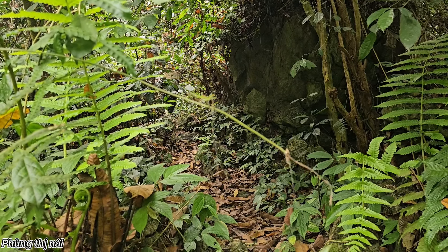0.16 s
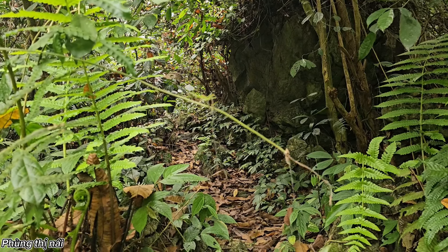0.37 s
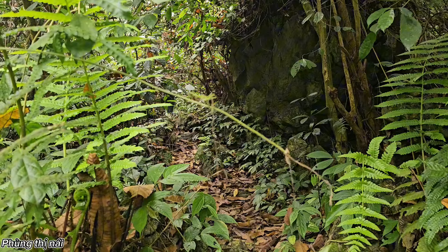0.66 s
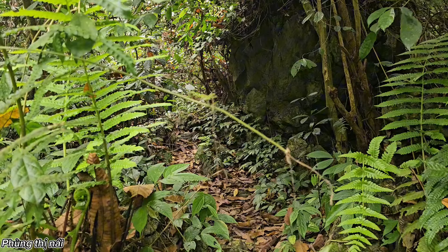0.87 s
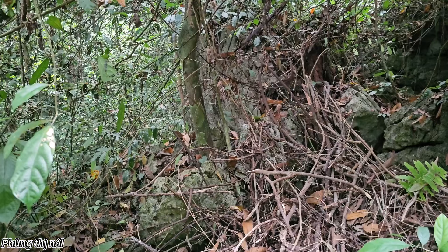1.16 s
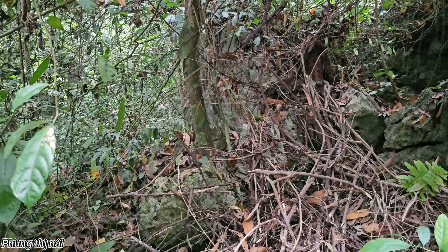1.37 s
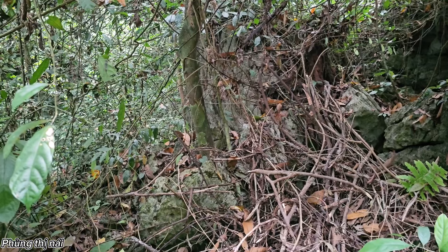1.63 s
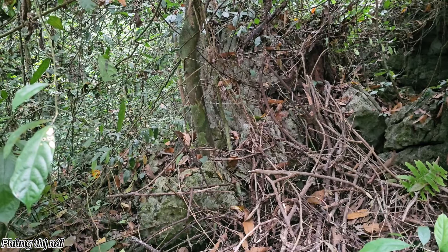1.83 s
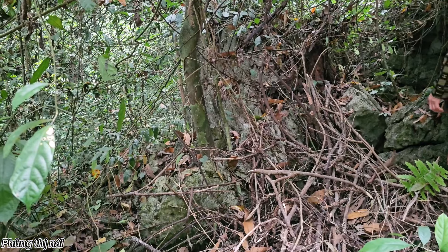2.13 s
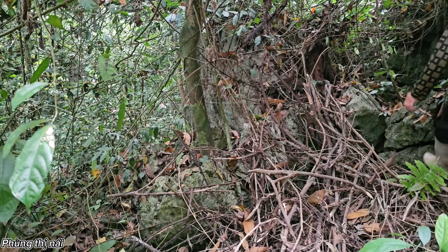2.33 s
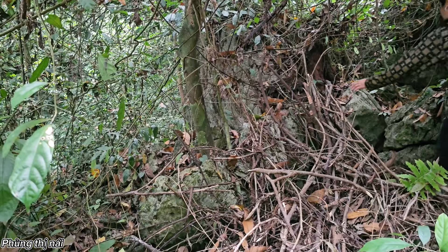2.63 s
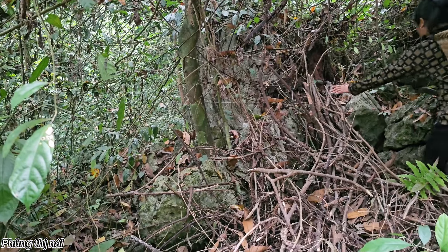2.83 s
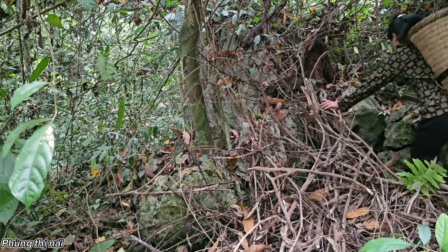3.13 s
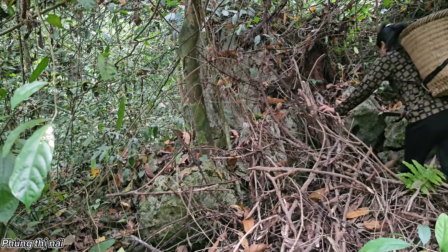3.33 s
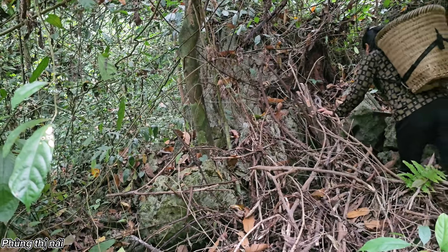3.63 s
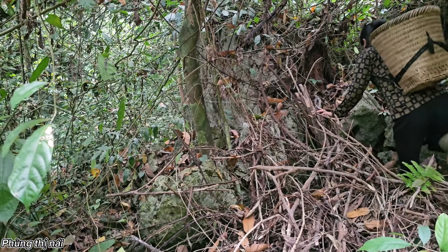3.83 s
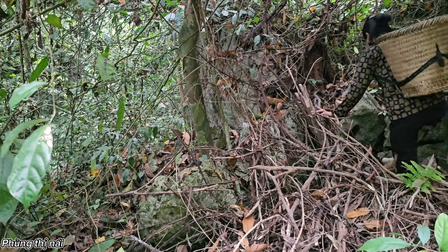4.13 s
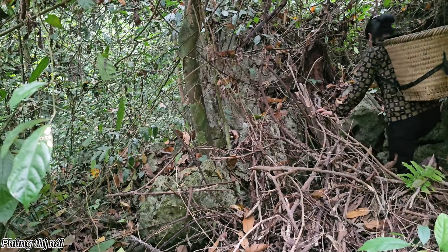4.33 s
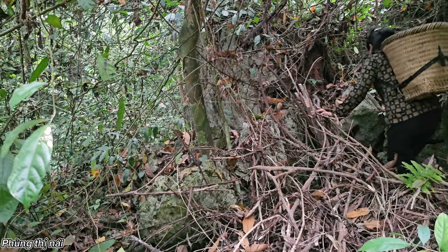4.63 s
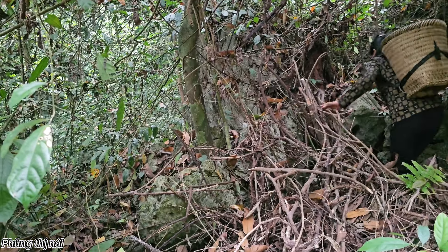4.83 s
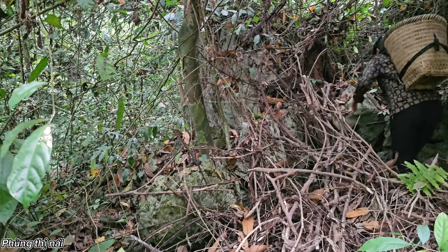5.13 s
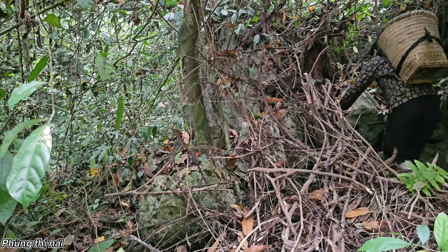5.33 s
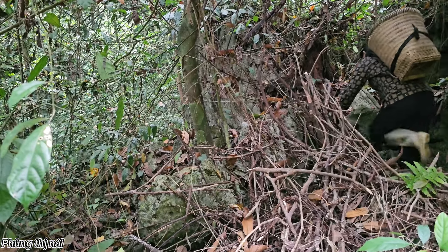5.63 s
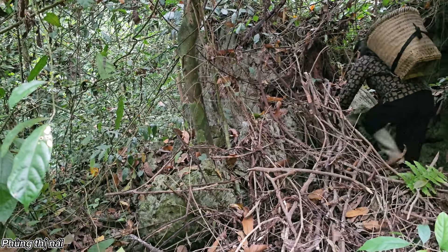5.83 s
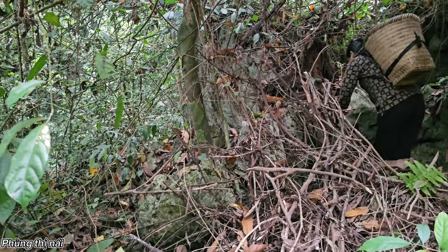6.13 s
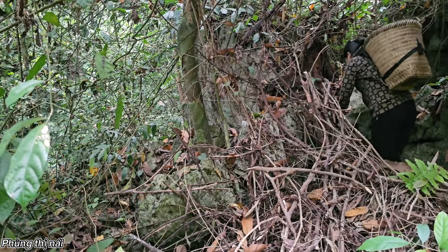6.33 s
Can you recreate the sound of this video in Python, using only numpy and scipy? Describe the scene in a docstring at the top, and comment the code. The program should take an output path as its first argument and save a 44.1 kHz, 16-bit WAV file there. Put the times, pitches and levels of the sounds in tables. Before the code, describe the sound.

Someone climbs past a heap of dead branches, rustling and snapping twigs; a bird whistles twice before a heavy hollow knock.

```python
"""Climbing past a heap of dead branches

A fluttering forest hiss with a faint far drone of narrow noise bands stops abruptly; a stiller spot follows.
A person climbs past the heap: sticks and soft ground ring as damped modes, leaves crackle as bursts of
fractures, thin twigs snap, and clothes brush the plants as swelling grains over softly stirred litter.
One thick branch gives a loud hollow knock, and a bird whistles twice in gliding, hoarse tones."""
import sys
import numpy as np
from scipy import signal
from scipy.fft import rfft, irfft, next_fast_len
from scipy.io import wavfile
from scipy.ndimage import uniform_filter1d, minimum_filter1d

SR = 44100
rng = np.random.default_rng(int(sys.argv[2]) if len(sys.argv) > 2 else 0)


def digitize_waveform(pressure):
    """Quantize a signal to 16-bit integers and store it at the path in sys.argv[1].

    Rows of a 2-D input are taken as channels; values are limited to [-1, 1].
    """
    field = np.atleast_2d(pressure).T
    bounded = np.clip(field, -1, 1)
    quanta = np.round(bounded * 32767).astype(np.int16)
    wavfile.write(sys.argv[1], SR, quanta)


N = 286341
TIME = np.arange(N) / SR

# soft ground under a foot: start_s, contact_s, pitch_hz, lower_mode_db, upper_mode_db
FOOTFALLS = [(1.021, 0.0021, 68.4, -31, -38.5), (3.18, 0.006, 85.4, -20, -25.5),
             (3.321, 0.0072, 94, -33.5, -34.5), (3.362, 0.038, 82.4, -50, -67),
             (5.366, .008, 85.7, -25.5, -9.5)]


def from_db(db):
    """Decibels to gain."""
    return 10 ** (np.asarray(db) / 20)


def rms_one(x):
    """Scale to unit rms."""
    return x / np.sqrt(np.mean(x ** 2) + 1e-20)


def in_time(rows):
    """Each column of a curve, joined by straight lines at every sample."""
    s, *columns = np.transpose(rows)
    return [np.interp(TIME, s, column) for column in columns]


def coloured(x, spectrum):
    """Give a steady signal a spectrum; rms 1."""
    hz, db = np.transpose(spectrum)
    size = next_fast_len(N)
    bins_hz = np.maximum(np.fft.rfftfreq(size, 1 / SR), 1)
    gain = from_db(np.interp(np.log(bins_hz), np.log(hz), db))
    return rms_one(irfft(rfft(x, size) * gain, size)[:N])


def drift(rate):
    """Random wander through `rate` new values a second, with a spread a little under 1."""
    return np.interp(TIME * rate, np.arange(N), rng.standard_normal(N))


def grains(per_s, spread_db):
    """Tiny fractures at random moments, of uneven size and either sign."""
    size_db = spread_db * np.minimum(rng.exponential(1, N), 3)
    sizes = from_db(size_db) * rng.choice([-1, 1], N)
    return sizes * (rng.random(N) < per_s / SR)


def burst(start, rise, hold, decay, steepness):
    """Samples and envelope of a push that swells, holds and dies; its square integrates to 1 over seconds."""
    span = slice(max(int((start - .06) * SR), 0), min(int((start + .2) * SR), N))
    t = TIME[span] - start
    swell = np.minimum(t, 0) / max(rise, 1e-4)
    fall = (np.maximum(t - hold, 0) / max(decay, 1e-4)) ** steepness
    shape = np.exp(swell - fall)
    return span, shape / np.sqrt(np.sum(shape ** 2) / SR)


def add_mode(out, start, contact, hz, db, ring_cycles, rough, swell_cycles):
    """A heavily damped mode, driven while the contact lasts and then left to die."""
    t = TIME[:min(SR // 5, N - int(start * SR))]
    swell = 1 - np.exp(-(t * hz / swell_cycles) ** 2)
    # the contact lets go gradually
    free_cycles = np.logaddexp(0, (t - .8 * contact) * hz * 3) / 3
    shape = swell * np.exp(-free_cycles / ring_cycles)
    # the pitch is pulled about, with a new random value every two cycles
    wobble = np.interp(t * hz / 2, np.arange(2000), rng.standard_normal(2000))
    wave = shape * np.sin(2 * np.pi * hz * np.cumsum(1 + rough * wobble) / SR)
    # the mode's energy is that of a signal at this rms level for the length of the contact
    out[int(start * SR):][:len(t)] += from_db(db) * wave * np.sqrt(contact * SR / np.sum(wave ** 2))


def background():
    """Still air as coloured noise, under a faint far hum that comes and goes with a wavering pitch."""
    # still air by the heap: frequency_hz, relative_level_db
    air = [(30, 11), (70, 1.5), (130, -9), (240, -2), (320, -12.5), (430, -5), (600, -17), (1000, -18),
           (1350, -12), (1900, -15), (4000, -20), (8000, -23), (16000, -17)]
    # hum: time_s, pitch_hz, relative_level_db
    hum_curve = [(1.95, 438.5, -95), (2.18, 458, -72), (2.35, 406, -78), (2.8, 437, -88.5),
                 (3.55, 430, -79.5), (4.0, 425, -96), (4.75, 428, -81.5), (5.1, 446, -78),
                 (5.6, 432, -87.5)]
    hz, db = in_time(hum_curve)
    level = from_db(db - 2.5 + 2 * drift(12))
    wavering_hz = hz * (1 + 0.011 * drift(18))
    hum = level * np.sin(2 * np.pi * np.cumsum(wavering_hz) / SR)
    return hum + from_db(-75) * coloured(rng.standard_normal(N), air)


def first_spot():
    """A fluttering forest hiss, and a far drone whose narrow bands each swell and wander."""
    # colour of the hiss: frequency_hz, relative_level_db
    hiss_colour = [(40, -7.5), (220, -6.5), (300, -10.5), (450, -1.5), (1050, -5.5), (1450, 1.5),
                   (1950, -9), (2700, 0.5), (3800, -5.5), (4500, 2), (5200, -13.5), (5850, -6), (6200, 0.5),
                   (8800, 1.5), (12000, -9), (16000, -10)]
    # level curves, trimmed below: time_s, hiss_db, drone_upper_bands_db
    hiss_levels = [(0.0, -55, -68), (0.044, -54.5, -68), (0.196, -60, -66), (0.23, -54, -57.5),
                   (0.574, -55.5, -58), (0.598, -57, -64), (0.81, -59.5, -58.5), (0.858, -60.5, -69),
                   (0.986, -56.5, -54.5), (1.06, -59, -66.5)]
    # bands of the drone: centre_hz, width_hz, relative_level_db
    drone_bands = [(405, 14, -2.5), (815, 30, 7), (1673, 31, 10.5), (2520, 25, 16.5), (2780, 28, -6),
                   (3270, 84, -23), (3390, 27, 9.5), (4520, 200, -21)]
    hiss_db, upper_db = in_time(hiss_levels)
    drone = np.zeros(N)
    for hz, width, db in drone_bands:
        r = np.exp(-np.pi * width / SR)
        # slowly changing noise spreads a tone into a narrow band
        spread = rms_one(signal.lfilter([1], [1, -r], rng.standard_normal((2, N))))
        phase = 2 * np.pi * np.cumsum(hz * (1 + .006 * drift(14))) / SR
        band = spread[0] * np.cos(phase) + spread[1] * np.sin(phase)
        swell_db = 3 * drift(50)
        level_db = upper_db - 16.0 if hz > 2000 else -71
        # for the same table level, a wider band carries more power
        drone += from_db(level_db + db + swell_db) * np.sqrt(width / 50) * band
    flutter_db = 1.6 * drift(70)
    hiss = from_db(hiss_db + 2.13 + flutter_db) * coloured(rng.standard_normal(N), hiss_colour)
    return hiss + drone


def bird():
    """Two thin, hoarse whistles, one falling and one rising; each swells as it glides, then fades on its last pitch."""
    # whistles: start_s, glide_s, first_pitch_hz, last_pitch_hz, relative_level_db, fade_s
    whistles = [(2.815, .15, 2606, 2139, -49, .015), (3.127, 0.067, 2690, 2884, -43, 0.043)]
    swell_over_glide_db = 16
    out = np.zeros(N)
    for s, glide, first_hz, last_hz, db, fade in whistles:
        progress = np.clip((TIME - s) / glide, 0, 1)
        hz = first_hz + (last_hz - first_hz) * progress
        release = np.exp(-np.clip((TIME - s - glide) / fade, 0, 20))
        flutter_db = 3.5 * drift(180)
        level_db = db - swell_over_glide_db * (1.5 - progress) + flutter_db
        level = (TIME > s) * release * from_db(level_db)
        quaver = 1 + .028 * drift(900)  # fast pitch jitter makes it hoarse
        out += level * np.sin(2 * np.pi * np.cumsum(hz * quaver) / SR)
    return out


def sweeps():
    """Levels in dB of brushing, sheen and litter: each stroke swells smoothly and lets go a little faster."""
    # clothes sweep past a plant: peak_s, swell_s, brushing_db, sheen_db, dragged_litter_db
    strokes = [(1.12, 0.1, -81, -74, -67), (2.2, 0.059, -76, -82, -72), (2.35, .11, -70.5, -88, -74.5),
               (2.66, 0.037, -91, -78, -67), (2.931, 0.21, -78, -85, -80.5), (3.36, .08, -68.5, -76, -66.5),
               (4.11, 0.094, -73.5, -73.5, -86), (4.32, 0.22, -76.5, -72.5, -82),
               (4.689, 0.067, -72, -66, -95.5), (4.9, .08, -80, -77.5, -88),
               (5.25, 0.13, -75.5, -75.5, -74), (5.428, 0.026, -81.5, -78, -72.5),
               (5.62, .12, -80, -80, -73.5), (5.92, 0.12, -76.5, -73, -94),
               (6.209, 0.067, -78.5, -73.5, -70.5), (6.47, 0.072, -86, -77.5, -72.5)]
    rest_db = [[-89.5], [-92], [-84]]  # brushing, sheen and litter between strokes
    release_share = 0.72  # release as a share of the swell
    power = from_db(rest_db) ** 2 * np.ones(N)
    for s, swell, *layer_db in strokes:
        width = np.where(TIME < s, swell, swell * release_share)
        hump = np.exp(-np.minimum(((TIME - s) / width) ** 2, 20))
        power += from_db(layer_db)[:, None] ** 2 * hump
    return 10 * np.log10(power)


def litter(dragged_db):
    """The litter is dragged along by each stroke, and gives and settles under each footfall."""
    # softly stirred litter: frequency_hz, relative_level_db
    litter_colour = [(30, 4.5), (220, -5), (550, -2.5), (800, -6), (1400, -7), (2000, -14), (4000, -14),
                     (12000, -32.5)]
    settle_db, settle_follows = -51, 0.291  # level under a 0 dB footfall; share of the footfall's dB followed
    press_s, settle_s = .02, 0.04
    level = from_db(dragged_db)
    for s, _, _, lower_db, _ in FOOTFALLS:
        give = np.exp(np.minimum((TIME - s) / press_s, (s - TIME) / settle_s))
        level += from_db(settle_db + settle_follows * lower_db) * give
    flutter = from_db(2.5 * drift(45))
    return level * flutter * coloured(rng.standard_normal(N), litter_colour)


def brushing():
    """Cloth slides over foliage, catching with tiny ticks, while the litter stirs softly."""
    # clothes brushing the plants: frequency_hz, relative_level_db
    brush_colour = [(800, -18), (1400, -9.5), (2000, -11), (3400, -6), (4550, 6.5), (5600, -6.5),
                    (7000, -2.5), (8000, 4.5), (9500, -10), (13000, -10.5), (16000, -17)]
    # bright sheen of sliding cloth: frequency_hz, relative_level_db
    sheen_colour = [(5000, -37.5), (7000, -6.5), (8600, 1), (11400, -11.5), (12200, -18), (16000, -22)]
    # crackle of cloth catching: frequency_hz, relative_level_db
    catch_colour = [(800, -5.5), (3000, 1), (9000, -1), (16000, -5)]
    brush_db, sheen_db, litter_db = sweeps()
    # the grip comes and goes many times a second
    grip_db = 2.2 * drift(35)
    brush_grains = coloured(grains(per_s=9800, spread_db=8.5), brush_colour)
    brush = from_db(brush_db + 3.0 + grip_db) * brush_grains
    sheen_grains = coloured(grains(per_s=6500, spread_db=4), sheen_colour)
    sheen = from_db(sheen_db + 5.5 + grip_db) * sheen_grains
    # each catch is a few milliseconds of crackle
    catch_starts = np.abs(grains(per_s=30, spread_db=1.2)) + 1e-18
    catches = signal.lfilter([1], [1, -np.exp(-1 / (.009 * SR))], catch_starts)
    crackle = coloured(grains(per_s=2900, spread_db=1.0), catch_colour)
    ticks = from_db(brush_db / 2 - 37.0) * catches * crackle
    return brush + sheen + ticks + litter(litter_db)


def twigs():
    """A thin twig parts with a sharp, ragged ring."""
    # snaps: start_s, pitch_hz, level_db
    snaps = [(1.1124, 8770, -34), (2.384, 2830, -56.5), (2.4553, 2860, -39.5), (2.457, 3370, -39.5),
             (2.504, 3340, -58), (2.983, 3420, -45), (3.175, 3300, -45), (3.197, 3360, -40.5),
             (3.288, 3360, -59), (3.406, 3220, -53), (4.222, 2530, -45)]
    ring_s = .003
    out = np.zeros(N)
    for s, hz, db in snaps:
        add_mode(out, s, ring_s, hz, db, ring_cycles=ring_s * hz, rough=0.092, swell_cycles=.5)
    return out


def leaves():
    """A crushed leaf gives a dense burst of fractures; the more brittle it is, the brighter their mix."""
    # dry leaves crushed, times scaled below: start_s, rise_s, decay_s, relative_level_db, brittleness_db
    crunches = [(1.1118, 0.00016, 0.0047, -44.5, 0), (1.444, 0.024, 0.012, -67.5, -8),
                (1.955, 0.0047, 0.0057, -69, -2), (2.458, .0015, .005, -62, -1),
                (2.589, 0.0073, 0.0058, -63, -4), (2.639, .0009, .012, -34.5, -0.5),
                (2.85, .004, 0.01, -67, -2), (2.964, 0.0057, 0.011, -50, -8.5),
                (2.987, 0.0017, 0.0077, -56.5, -5), (3.057, 0.0073, 0.013, -46.5, -4),
                (3.198, .026, 0.018, -58.5, -3), (3.326, .005, .008, -59.5, -3.5),
                (3.375, .01, 0.026, -71, 5), (3.477, .006, 0.012, -61, 0), (3.671, .0009, 0.0048, -55, 0.5),
                (3.687, 0.0029, 0.0094, -42, 5), (3.696, 0.0022, 0.011, -37.5, 4),
                (4.22, .0016, 0.014, -57.5, -1), (4.388, 0.0053, 0.0069, -57, 0.5),
                (4.434, 0.0037, 0.01, -45, 6.5), (4.719, 0.0091, 0.011, -52, 4.5),
                (5.015, 0.0045, 0.0094, -67, 2.5), (5.366, 0.015, 0.013, -54, -2),
                (6.133, 0.0082, 0.0031, -48.5, 7), (6.145, 0.005, .015, -47, 18.5),
                (6.303, .0055, 0.014, -64, 0.5), (6.427, .013, 0.015, -56, -2.5)]
    # crackle of stiff leaves: frequency_hz, relative_level_db
    stiff_leaf = [(300, -7), (1500, -16.5), (2700, -9), (4000, -4), (5400, -0.5), (7000, -14), (12000, -49)]
    # crackle of thin leaves: frequency_hz, relative_level_db
    thin_leaf = [(2000, -38.5), (5000, -8.5), (6300, 1), (8700, -1.5), (10500, -7.5), (14000, -20)]
    # crackle of brittle leaves: frequency_hz, relative_level_db
    brittle_leaf = [(4000, -26), (9000, -12), (11500, 2.5), (14000, 3), (16000, -2.5)]
    levels = np.zeros((3, N))
    for s, rise, decay, db, brittle_db in crunches:
        span, shape = burst(s, rise * 0.69, 0, decay * 1.36, steepness=1.4)
        # brittleness tilts the balance from stiff towards brittle crackle
        grade_db = db + brittle_db * np.array([-1, 0, 1])
        levels[:, span] += from_db(grade_db)[:, None] * shape * np.sqrt(abs(rise + decay) / 2)
    out = np.zeros(N)
    for level, colour in zip(levels, (stiff_leaf, thin_leaf, brittle_leaf)):
        out += level * coloured(grains(per_s=9000, spread_db=-6), colour)
    return out


def feet():
    """The soft ground booms briefly under the weight, in two modes."""
    upper_ratio = 1.66  # pitch of the upper mode over the lower one
    out = np.zeros(N)
    for s, contact, hz, lower_db, upper_db in FOOTFALLS:
        for mode_hz, db in ((hz, lower_db), (hz * upper_ratio, upper_db)):
            add_mode(out, s, contact, mode_hz, db, ring_cycles=0.96, rough=0.04, swell_cycles=.28)
    return out


def sticks():
    """Each knock rings the stick and the heap under it, over a dull body noise, with a short splintering crack."""
    # a stick knocks the heap, contact and crack scaled below: start_s, contact_s, pitch_hz, stick_db, heap_db, crack_db
    knocks = [(1.2, 0.0087, 1700, -66, -73, -78), (1.442, 0.0075, 530, -62, -72, -52.5),
              (1.479, 0.0039, 734, -61.5, -57, -66.5), (1.512, 0.011, 604, -66.5, -69, -97),
              (1.737, 0.0044, 754, -51, -61, -67.5), (1.954, .014, 537, -54, -65, -68.5),
              (2.411, 0.0071, 604, -54.5, -56, -69), (2.428, .009, 523, -45, -51, -90),
              (2.455, 0.0035, 1365, -41, -45, -44), (2.502, 0.0057, 1550, -62, -60, -58),
              (2.513, 0.0034, 502, -43.5, -48.5, -78), (2.585, 0.011, 1356, -49.5, -34, -58),
              (2.669, 0.015, 1790, -97, -40, -64.5), (2.963, 0.0042, 1003, -37, -62, -43),
              (2.983, 0.0049, 512, -47.5, -54, -50.5), (3.054, 0.012, 934, -29, -26.5, -42),
              (3.179, 0.014, 569, -39, -44.5, -48), (3.302, 0.0072, 600, -54, -51, -65),
              (3.323, 0.0092, 522, -29.5, -52, -51), (3.338, 0.01, 806, -81, -35.5, -81),
              (3.368, 0.019, 1020, -60.5, -60.5, -59), (3.684, 0.013, 460, -56.5, -50, -81),
              (3.836, 0.0017, 1210, -45.5, -84, -67), (4.139, 0.01, 672, -43.5, -58, -70),
              (4.195, 0.013, 406, -74, -40.5, -74), (4.219, 0.0029, 972, -34, -35, -52),
              (4.255, 0.0035, 800, -53.5, -56, -67), (4.366, .024, 750, -55.5, -64, -70.5),
              (4.384, 0.0064, 673, -31.5, -40, -66), (4.414, 0.0064, 447, -73, -41, -81),
              (4.431, 0.014, 1590, -60, -57.5, -68), (4.903, 0.01, 1100, -83, -63, -81),
              (5.231, 0.0089, 469, -57.5, -50.5, -67.5), (5.242, 0.0057, 1000, -53.5, -57, -83),
              (5.316, 0.013, 580, -55, -57, -62.5), (5.365, 0.011, 781, -25, -1, -43.5),
              (5.525, 0.0027, 783, -88.5, -39.5, -70), (5.604, 0.0046, 707, -53.5, -61, -71.5),
              (5.638, 0.002, 1090, -49.5, -62, -60), (5.832, .008, 1524, -67, -89, -89),
              (5.893, 0.011, 578, -62, -60.5, -69.5), (6.112, 0.0039, 538, -52.5, -47, -53.5),
              (6.131, 0.0031, 598, -49, -57, -51), (6.299, 0.0076, 898, -63, -66.5, -60.5),
              (6.41, 0.018, 582, -51, -48, -60.5)]
    # modes of the whole heap: pitch_hz, relative_level_db, share_driven_by_stick, ring_cycles, swell_cycles
    heap_modes = [(263, -1.5, 0.035, 0.97, .35), (537, -3, .3, 1.4, 0.58)]
    # dull body of wood: frequency_hz, relative_level_db
    wood_body = [(30, -23.5), (80, -10.5), (220, -16.5), (390, -9), (540, 11.5), (800, 0), (1050, -5),
                 (1500, -27), (3000, -42.5)]
    # splitting wood: frequency_hz, relative_level_db
    crack_colour = [(500, 2), (1200, 4), (1900, 10), (3000, 9), (4500, -2), (7000, -12.5), (10000, -34),
                    (16000, -24)]
    overtone_ratio, overtone_db = 1.6, -19.5  # a stick's second mode against its first
    modes, body, crack = np.zeros((3, N))
    for s, contact, hz, stick_db, heap_db, crack_db in knocks:
        # damp wood meets softly, so each mode takes a moment to build up
        for heap_hz, mode_db, share, ring, swell in heap_modes:
            drive_db = heap_db + share * (stick_db - heap_db)
            add_mode(modes, s, contact, heap_hz, drive_db + mode_db,
                     ring_cycles=ring, rough=0.019, swell_cycles=swell)
        add_mode(modes, s, contact * 0.87, hz, stick_db, ring_cycles=3.2, rough=0.082, swell_cycles=.8)
        add_mode(modes, s, contact * 1.1, hz * overtone_ratio, stick_db + overtone_db,
                 ring_cycles=4.5, rough=0.12, swell_cycles=1.2)
        # the dull body noise follows the stick's level, a few dB below it
        body_db = stick_db - 4.5
        span, shape = burst(s, rise=0.0031, hold=contact * .4, decay=0.0091, steepness=1.0)
        body[span] += shape * np.sqrt(contact) * from_db(body_db)
        span, shape = burst(s + .001, rise=.0015, hold=contact * 1.2, decay=0.0046, steepness=0.97)
        crack[span] += shape * np.sqrt(contact) * from_db(crack_db + 1.5)
    body_noise = coloured(rng.standard_normal(N), wood_body)
    splinters = coloured(grains(per_s=2800, spread_db=1.5), crack_colour)
    return modes + body * body_noise + crack * splinters


def forest(x, t60, wet_db):
    """Trunks and rocks scatter a short, dull tail, faint behind wood and strong behind the bird."""
    t = TIME[:SR // 2]
    dull_noise = signal.lfilter([1], [1, -.6], rng.standard_normal(len(t)))
    tail = dull_noise * from_db(-60 * t / t60) * (t > .006)
    tail = tail / np.sqrt(np.sum(tail ** 2))
    return x + from_db(wet_db) * signal.fftconvolve(x, tail)[:N]


def scene():
    """The hissing spot, a moment of silence, then the climb past the heap."""
    wood = forest(sticks() + feet(), t60=0.33, wet_db=-52)
    foliage = forest(leaves() + twigs(), t60=0.2, wet_db=-29.5)
    song = forest(bird(), t60=0.22, wet_db=-2.5)
    hiss_ends_s, heap_begins_s = 1.069, 1.111
    first, second = TIME < hiss_ends_s, TIME > heap_begins_s
    heap_spot = foliage + song + brushing() + background()
    # the wood and footfall layer is open at both spots
    return (first * first_spot() + (first | second) * wood + second * heap_spot)[None]


def record(dry):
    """The microphone sheds the deepest bass, a smooth limiter holds the loudest knock, and the top is cut."""
    x = signal.sosfilt(signal.butter(2, 36, "high", fs=SR, output="sos"), dry)
    gain = minimum_filter1d(.99 / np.maximum(np.abs(x), .99), size=441)
    gain = uniform_filter1d(uniform_filter1d(gain, size=220), size=220)
    cutoff_hz = 15950
    return signal.sosfilt(signal.ellip(10, .1, 80, cutoff_hz, fs=SR, output="sos"), x * gain)


dry = scene()
out = record(dry)
digitize_waveform(out)
```